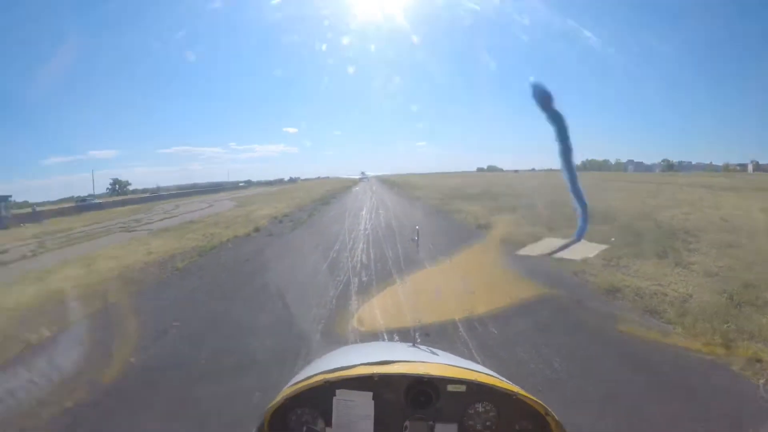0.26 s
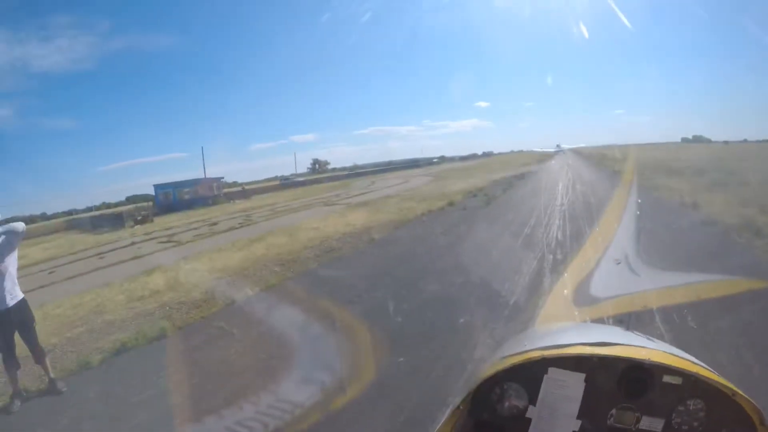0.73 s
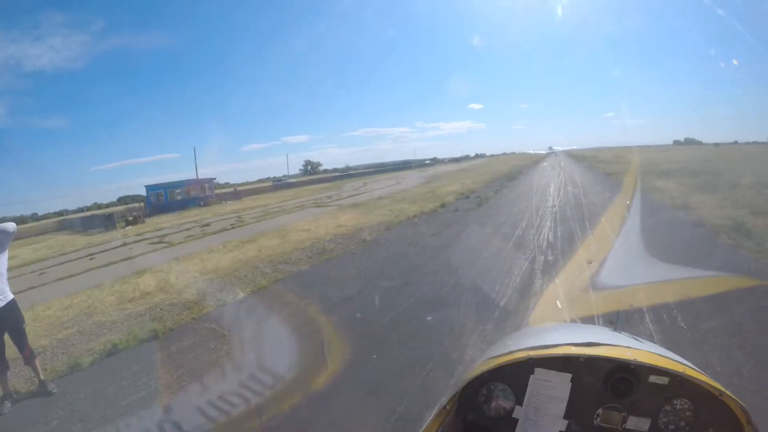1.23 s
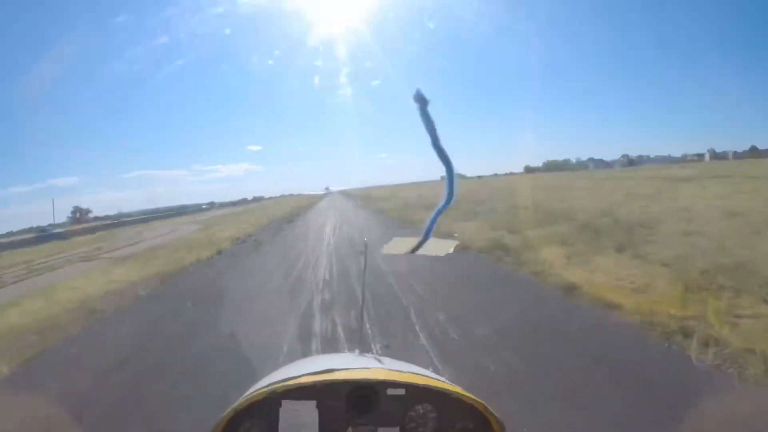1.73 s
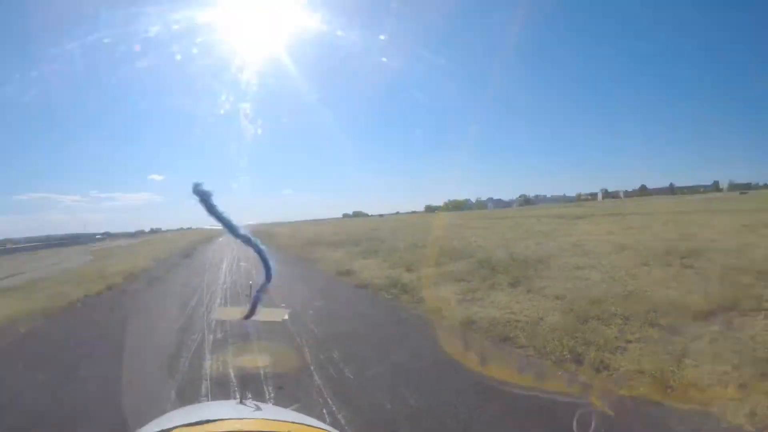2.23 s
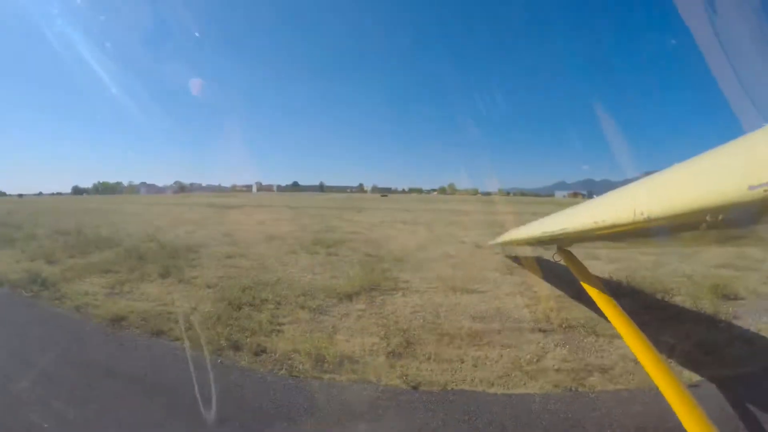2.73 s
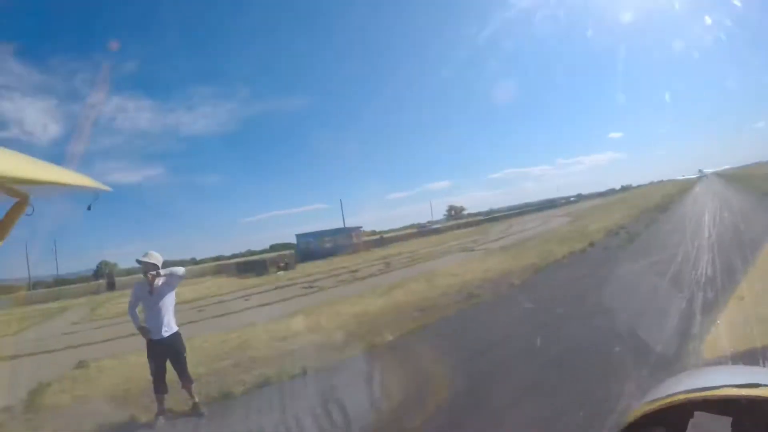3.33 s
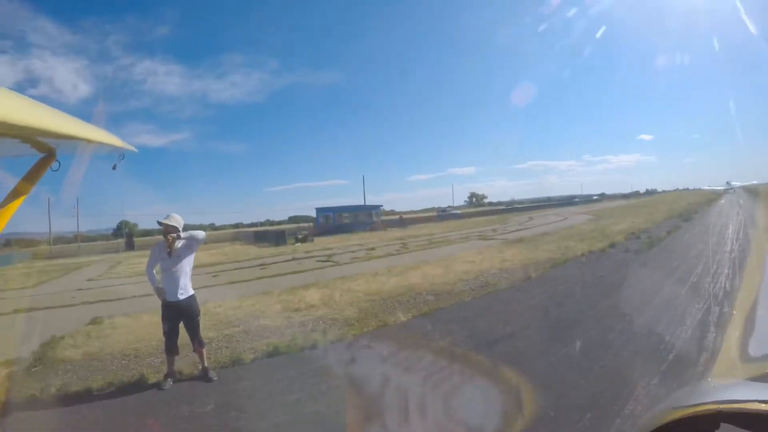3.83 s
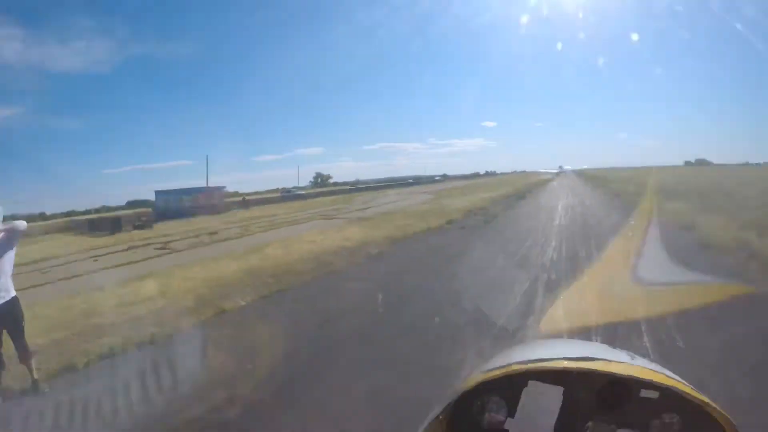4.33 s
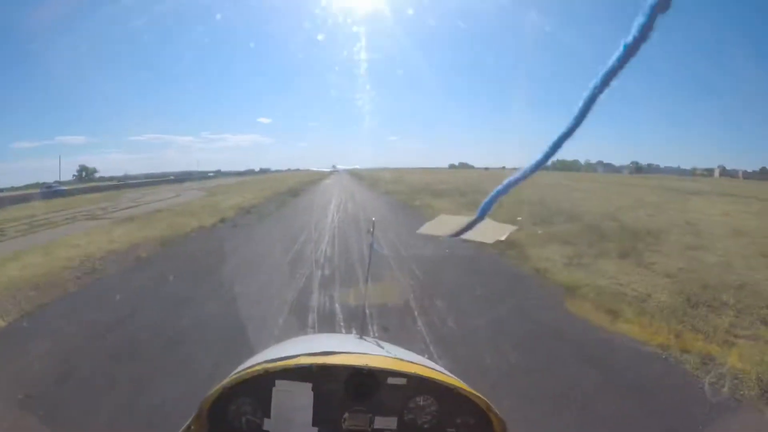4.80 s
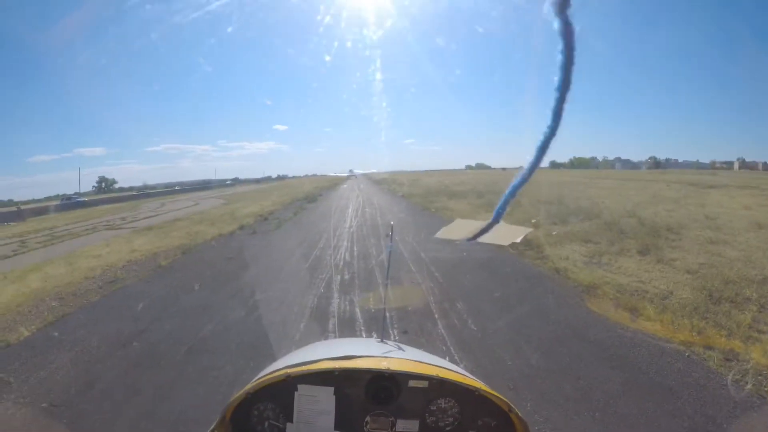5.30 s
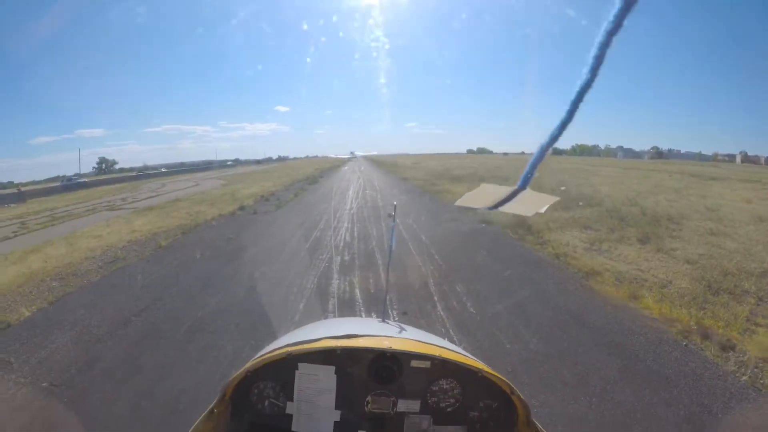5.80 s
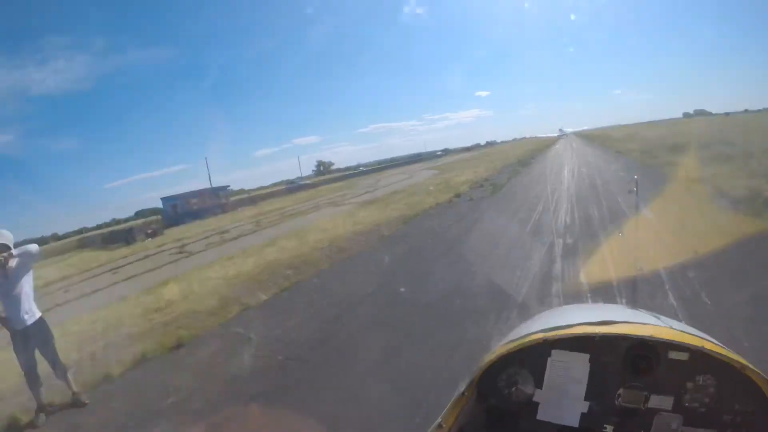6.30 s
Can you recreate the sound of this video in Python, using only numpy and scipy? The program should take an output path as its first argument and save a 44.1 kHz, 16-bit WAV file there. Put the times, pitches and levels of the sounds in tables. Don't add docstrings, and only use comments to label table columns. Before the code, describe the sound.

Inside a small, hard-walled glider cockpit, low gusty wind booms steadily over a faint engine drone and soft hiss. Metal linkages knock and loose parts rattle over dull panel thuds. A heavy bump hits the microphone case at 0.6 seconds, a sharp knock follows at 1.4, and a harder bump comes at 3.8, each bump followed by strap rubbing. The small head-worn microphone is very close to the handling noise.

```python
import sys
import numpy as np
from scipy import signal
from scipy.fft import rfft, irfft
from scipy.io import wavfile
from scipy.ndimage import uniform_filter1d

SR = 44100
rng = np.random.default_rng(int(sys.argv[2]) if len(sys.argv) > 2 else 0)


def put_to_file(sound):
    columns = np.atleast_2d(sound).T
    safe = np.clip(columns, -1, 1)
    whole_steps = np.round(safe * 32767)
    wavfile.write(sys.argv[1], SR, whole_steps.astype(np.int16))


def volts(x):
    e = np.asarray(x, float) / 20
    return 10 ** e


N = 288855


def evened(x):
    return x / np.sqrt(np.mean(x ** 2) + 1e-20)


def peak(x):
    return x / np.sqrt(uniform_filter1d(x ** 2, size=180).max())


def add(mix, start_s, sound):
    part = mix[round(start_s * SR):][:len(sound)]
    part += sound[:len(part)]


def play(source, rows):
    mix = np.zeros(N)
    for row in rows:
        add(mix, *source(*row))
    return mix


def resonate(x, hz, width_hz):
    turn = np.exp(2j * np.pi * np.cumsum(hz * np.ones(len(x))) / SR)
    decay = np.exp(-np.pi * width_hz / SR)
    smooth = signal.lfilter([1 - decay], [1, -decay], x / turn + 1e-18)
    return 2 * (turn * smooth).real


def body(x, modes):
    out = np.zeros(len(x))
    for k, (hz, width_hz, db) in enumerate(modes):
        out += (-1) ** k * volts(db) * resonate(x, hz, width_hz) / np.sqrt(width_hz)
    return out


def filtered(x, spectrum):
    f, db = np.transpose(spectrum)
    hz = np.fft.rfftfreq(len(x), 1 / SR)
    gain = volts(np.interp(np.log(hz + 1), np.log(f), db))
    return irfft(rfft(x) * gain, len(x))


def coloured(spectrum, count, patchy_db, flicker_db):
    frames, hz = count // 128 + 6, np.fft.rfftfreq(512, 1 / SR)
    a, b, patches = rng.standard_normal((frames, 257, 3)).T
    patches = uniform_filter1d(patches, size=6, axis=0)
    patches = evened(uniform_filter1d(patches, size=16, axis=1))
    flicker = evened(uniform_filter1d(rng.standard_normal(frames), size=5))
    f, db = np.transpose(spectrum)
    level_db = np.interp(np.log(hz + 1), np.log(f), db)[:, None]
    level_db = level_db + patchy_db * patches + flicker_db * flicker
    noise = signal.istft((a + 1j * b) * volts(level_db), nperseg=512, noverlap=384)[1]
    return evened(noise[:count])


def fibres(count):
    a, b = rng.standard_normal((count, 2)).T
    return a * volts(0.3 * b)


def rebounds(count):
    return volts(3.65 * evened(uniform_filter1d(rng.standard_normal(count), size=130)))


# start in seconds, blow in dB,
# place from long tube [-1] to short tube [1], ring T60 in seconds.
KNOCKS = [(0.438, -60, 0.45, 0.14), (0.465, -50, -1.1, .07), (0.538, -36, -0.62, .14),
          (1.130, -42.5, 0.36, 0.091), (1.172, -45, -0.39, 0.19), (1.192, -45, 0.032, 0.097),
          (1.263, -45.5, 0.19, .07), (1.319, -55, -0.38, 0.077), (1.399, -21, 0.3, .09),
          (1.509, -58, -.9, .1), (1.564, -55, -0.51, .09), (1.826, -43.5, -0.035, 0.16),
          (1.932, -52, -0.31, .09), (2.038, -52, -0.021, 0.055), (2.26, -41, -0.18, 0.15),
          (2.722, -52, -0.72, 0.1), (3.107, -55, -0.21, 0.065), (3.211, -47, -0.58, 0.05),
          (3.575, -63, .01, .07), (4.643, -39.5, -0.89, 0.13), (4.708, -38.5, 0.083, .11),
          (4.911, -57, .2, .07), (5.251, -62, 0.23, .15), (5.320, -51.5, .01, 0.23),
          (5.598, -56, 0.78, 0.15), (5.722, -45.5, -0.39, 0.12), (5.808, -47, -0.22, 0.086),
          (5.933, -45, 0.24, 0.11), (6.201, -43.5, -0.094, 0.21), (6.358, -44, -0.31, 0.21)]
# centre in Hz, width in Hz, level in dB.
STRUTS = [(774, 210, 13), (1390, 120, 7.5), (1520, 200, 7), (2280, 780, 1), (2410, 860, -17)]
LONG_TUBE = [(304, 57, -2), (396.3, 5.7, -3), (530, 41, 4.5)]
# centre in Hz, width in Hz.
SHORT_TUBE = (600, 160)


def knock(start_s, blow_db, place, t60_s):
    tubes_db = 6 - 0.39 * (blow_db + 43)
    long_db, short_db = tubes_db - 4.5 * place, tubes_db + 4.5 * place
    t = np.arange(9000) / SR
    fade = volts(-60 * t / np.clip(t60_s, .02, .4)) * (1 - np.exp(-t / 0.00025))
    first_contact = volts(2 * np.exp(-t / 0.0037))
    chatter = fibres(len(t)) * fade * rebounds(len(t)) * first_contact
    long = resonate(body(chatter, LONG_TUBE), 251, 166)
    short = resonate(resonate(chatter, *SHORT_TUBE), SHORT_TUBE[0], 170)
    struts = resonate(body(chatter, STRUTS), 1200, 3800)
    tubes = volts(long_db) * peak(long) + volts(short_db) * peak(short)
    return start_s, volts(blow_db) * (peak(struts) + tubes)


# start in seconds, level in dB, tilt in dB per octave.
RATTLES = [(0.465, -50.5, 0), (0.537, -44, 7), (0.554, -52, 4), (1.093, -51.5, -9), (1.1296, -53, 2),
           (1.1702, -45, 4.5), (1.19, -53, -11), (1.262, -41.5, 8.5), (1.397, -31, 7), (1.417, -30.5, -4),
           (1.56, -50, -2), (1.806, -45.5, 1), (1.826, -47.5, 7), (1.925, -56, -3), (2.035, -49.5, 1.5),
           (2.261, -51, 6.5), (2.7224, -51, 9.5), (3.123, -55, 0), (3.21, -56, 3), (3.57, -48, 2),
           (4.641, -39.5, 1.5), (4.7078, -44, 4), (4.9095, -55.5, 7), (5.25, -52.5, 3.5), (5.33, -55.5, 8),
           (5.72, -53, 7), (5.807, -54, 7), (5.93, -51, 10.5), (6.2, -47, 9), (6.357, -50, 7.5)]
# frequency in Hz, density in dB per Hz.
CLATTER = [(1530, 10), (2600, 6.5), (3060, 3), (3320, 3), (4370, -1.5), (5880, -3), (7130, -10.5),
           (9450, -12.5), (10600, -21), (12200, -27), (15300, -33)]


def rattle(start_s, db, tilt_db):
    hold_s = 0.071
    t = np.arange(7000) / SR
    colour = [(hz, level_db + tilt_db * np.log2(hz / 5500)) for hz, level_db in CLATTER]
    linger = (1 - np.exp(-t / 0.0022)) * volts(-60 * (t / hold_s) ** 1.64)
    return start_s, volts(db) * peak(filtered(fibres(len(t)), colour) * linger * rebounds(len(t)))


# start in seconds, peak in dB, panel note in Hz.
THUDS = [(0.473, -32, 172), (0.532, -29, 170), (0.558, -26, 221), (1.132, -19.5, 174), (1.192, -32.5, 247),
         (1.248, -26, 212), (1.396, -23, 183), (1.511, -23.5, 171), (1.565, -23.5, 180), (1.825, -20, 194),
         (2.126, -39, 180), (2.263, -28.5, 204), (3.22, -26, 181), (3.923, -23.5, 199), (4.317, -34, 268),
         (4.433, -26.5, 183), (4.649, -23.5, 176), (4.709, -27.5, 199), (5.325, -27, 160),
         (5.358, -28, 217), (5.602, -27.5, 201), (5.727, -22, 188), (5.931, -23.5, 185), (6.203, -24, 195),
         (6.368, -19.5, 187)]


def thud(start_s, db, hz):
    t60_s = 0.082
    t = np.arange(9000) / SR
    neighbour = np.sin(2 * np.pi * 1.375 * hz * t + 2 * np.pi * rng.random())
    ring = np.sin(2 * np.pi * hz * t) + 0.16 * neighbour
    return start_s, volts(db) * peak(ring * (1 - np.exp(-t / 0.0017)) * volts(-60 * t / t60_s))


# time in seconds, tick in dB,
# bright part in dB re tick, scrape length in seconds.
BUMPS = [
    (0.602, -41, -20, 0.0022),
    (0.612, -30.5, -29, 0.0028),
    (0.6228, -24.5, -27, 0.003),
    (3.772, -43, -17, 0.0022),
    (3.7844, -38, -12, 0.0032),
    (3.794, -23.5, -20, 0.0081),
    (3.8065, -14.5, -10.5, 0.0024),
    (3.837, -47, -26, 0.0017),
]
# centre in Hz, width in Hz, level in dB.
CASE = [(550, 100, -3), (930, 116, -3.5), (1506, 280, -1), (1950, 650, -5), (2510, 390, -7.5)]
CASE_TOP = [(2960, 540, 14), (4050, 1100, 20), (4900, 1500, 20), (5670, 260, 14.5), (8700, 260, 4),
            (11400, 2900, -18)]


def bump(time_s, tick_db, bright_db, scrape_s):
    t = np.arange(4000) / SR - .004
    slope_s = np.where(t < .0008, .0011, max(scrape_s, .0005))
    crack = rng.standard_normal(len(t)) * np.exp(-abs(t - .0008) / slope_s)
    ring = peak(resonate(body(crack, CASE), 730, 1500))
    bright = peak(resonate(body(crack, CASE_TOP), 6300, 6700))
    return time_s - .004, volts(tick_db) * (ring + volts(bright_db) * bright)


# time in seconds, mount shake in dB, head sway in dB, direction sign.
JOLTS = [
    (0.614, -10, -30, -1),
    (0.6221, -11, -35, -1),
    (0.6269, -3, -26, 1),
    (0.629, -19, -8, -1),
    (0.638, -9.5, -36, -1),
    (3.789, -13, -28, -1),
    (3.8, -1.5, -34, 1),
    (3.8099, -0.5, -32, -1),
    (3.813, -1.5, -21, 1),
]
# frequency in Hz, level in dB, T60 in seconds.
MOUNT = [(125.5, 2, 0.054), (225, -5.5, 0.038), (342, 13.5, 0.01), (70, -37, 0.15)]
# frequency in Hz, T60 in seconds.
SWAY = (31, 0.3)


def jolt(time_s, shake_db, sway_db, way):
    t = np.arange(16000) / SR
    shake = sum(volts(db - 60 * t / t60_s) * np.sin(2 * np.pi * hz * t) for hz, db, t60_s in MOUNT)
    sway = volts(-60 * t / SWAY[1]) * np.sin(2 * np.pi * SWAY[0] * t)
    motion = volts(shake_db) * peak(shake) + volts(sway_db) * sway
    soft = uniform_filter1d(np.pad(motion, (80, 0)), size=50)
    return time_s - .001, np.sign(way) * uniform_filter1d(soft, size=36)


# start in seconds, length in seconds, rush in dB, fizz in dB.
SLIDES = [(0.616, 0.2, -40.5, -63.5), (1.101, 0.43, -42, -57), (1.398, 0.042, -37.5, -58),
          (1.453, 0.089, -43.5, -58), (1.603, 0.27, -54, -67), (2.116, .13, -49, -68),
          (2.999, 0.17, -55, -65), (3.785, 0.064, -28.5, -74), (3.849, 0.18, -41, -61),
          (4.042, 0.24, -40.5, -65.5), (4.318, 0.22, -54, -80), (5.233, 0.14, -50, -62),
          (5.493, 0.098, -48.5, -64)]
# frequency in Hz, density in dB per Hz.
STRAP = [(120, -53), (220, 3.5), (450, -8.5), (800, -15.5), (1500, -21), (2000, -30), (3200, -50),
         (10000, -72)]


def slide(start_s, length_s, rush_db, fizz_db):
    grip_s, let_go_s, rest_db = 0.018, 0.064, -15.5
    t = np.arange(0, length_s + let_go_s, 1 / SR)
    at_rest = np.clip(np.maximum(1 - t / grip_s, (t - length_s) / let_go_s), 0, 1)
    rush = coloured(STRAP, len(t), patchy_db=1.2, flicker_db=1.0)
    fizz = resonate(resonate(fibres(len(t)), 2600, 7300), 3700, 11000)
    fizz = evened(signal.lfilter(*signal.butter(2, 8200 / (SR / 2)), fizz))
    rub = volts(rush_db) * rush + volts(fizz_db + 2 * t) * fizz
    return start_s, volts(rest_db * at_rest) * rub * signal.windows.tukey(len(t), .06)


def glide(length_s, from_hz, to_hz, width_hz, db):
    way = np.linspace(0, 1, round(length_s * SR))
    hz = from_hz + (to_hz - from_hz) * way
    band = fibres(len(way))
    for widen in (1, 1.6, 2.5):
        band = resonate(band, hz, widen * width_hz)
    return volts(db - 6 * way) * evened(band) * signal.windows.tukey(len(way), .3)


# start in seconds, length in seconds,
# closing gap in dB, opening gap in dB.
DRIFTS = [
    (0.638, 0.45, -64.5, -88),
    (1.428, .62, -74, -67.5),
    (3.835, 0.51, -78, -66),
    (3.922, 0.68, -63, -84),
]
# from in Hz, to in Hz, width in Hz, level in dB.
CLOSING = [(1030, 1380, 880, 5), (1730, 2660, 650, 4.5), (4400, 5100, 650, -5.5)]
OPENING = [(6300, 6800, 650, -3), (8900, 6700, 900, 1.7), (10300, 9100, 1200, -4)]


def gap_hiss(start_s, length_s, closing_db, opening_db):
    hiss = 0
    for level_db, bands in ((closing_db, CLOSING), (opening_db, OPENING)):
        for from_hz, to_hz, width_hz, db in bands:
            hiss = hiss + glide(length_s, from_hz, to_hz, width_hz, level_db + db)
    return start_s, hiss


# start in seconds, length in seconds, level in dB, tilt in dB per octave.
BUZZES = [
    (.612, 0.028, -53, 5),
    (0.644, 0.106, -67, -2),
    (1.263, 0.036, -51, 7),
    (1.385, 0.053, -43.5, 6),
    (3.794, 0.021, -47, -2.5),
    (3.826, 0.068, -51, 4),
    (3.901, 0.1, -66, -1),
]
# centre in Hz, width in Hz, level in dB.
BUZZ = [(1610, 480, 10), (4180, 500, -1), (5460, 1400, 2.5)]


def case_buzz(start_s, length_s, level_db, tilt_db):
    buzz = 0
    for hz, width_hz, db in BUZZ:
        band_db = level_db + db + tilt_db * np.log2(hz / 5750)
        buzz = buzz + glide(length_s, hz, hz, width_hz, band_db)
    return start_s, buzz


# start in seconds, length in seconds, centre in Hz, width in Hz, level in dB.
TUBE_HUM = (6, 1, 633, 64, -51)


def tube_hum(start_s, length_s, hz, width_hz, db):
    return start_s, glide(length_s, hz, hz, width_hz, db)


# time in seconds, gust in dB, side-on share from -1 to 1.
GUSTS = [(0.0, -21.5, 0.01), (0.44, -29, 0.011), (0.69, -22.5, 0.01), (1.0, -35.5, 0.01),
         (1.26, -18.5, 0.01), (1.5, -26.5, 0.01), (2.21, -24, 0.01), (2.74, -26, 0.01), (3.14, -24, 0.01),
         (3.34, -28, 0.01), (3.76, -28, 0.01), (4.34, -33, 0.01), (4.71, -27, 0.01), (4.98, -28.5, 0.01),
         (5.34, -27.5, 0.01), (5.87, -26, 0.01), (6.24, -27.5, 0.01), (6.55, -23, 0.01)]
# centre in Hz, width in Hz, level in dB.
BOOMS = [(90.7, 26, 0.5), (118, 26, 1.5), (157, 13.5, -4), (161.6, 5.25, -6.5)]
# centre in Hz, width in Hz.
LOW_BOOM = (50.6, 18.7)
# frequency in Hz, density in dB per Hz.
HUSH = [(100, -42), (170, -4), (210, -11), (300, -15.5), (500, -23), (650, -25), (1000, -31.5), (2000, -39),
        (4500, -45), (6500, -46.5), (10000, -46), (11500, -51.5), (13500, -55), (15300, -69)]
# frequency in Hz, level in dB.
DRONE = (53.2, -29.5)


def wind():
    t = np.arange(N) / SR
    time_s, gust_db, side = np.transpose(GUSTS)
    gust_db = np.interp(t, time_s, gust_db) + 24
    side_db = 2 * np.interp(t, time_s, side)
    a, b, c = rng.standard_normal((N, 3)).T
    buffet = resonate(resonate(a, 22.5, 18), 22.5, 18)
    low = resonate(resonate(b, *LOW_BOOM), LOW_BOOM[0], 46)
    upper = resonate(body(c, BOOMS), 134.3, 76)
    booms = volts(-26.5 + 0.99 * gust_db + side_db) * evened(buffet)
    booms += volts(-29 + 0.43 * gust_db - side_db) * evened(low)
    booms += volts(-29 + 0.49 * gust_db) * evened(upper)
    drone = volts(DRONE[1]) * np.sqrt(2) * np.sin(2 * np.pi * DRONE[0] * t + 0.9)
    hush = volts(-41.5) * coloured(HUSH, N, patchy_db=0.52, flicker_db=-0.23)
    return booms + drone + hush


def cabin(x):
    t = np.arange(8000) / SR
    hits = rng.random(len(t)) < 2500 / SR
    taps = rng.choice([-1., 1.], len(t)) * hits * volts(-60 * t / 0.19)
    return signal.oaconvolve(x, taps / np.linalg.norm(taps))[:N]


def scene():
    frame = play(knock, KNOCKS) + play(rattle, RATTLES)
    hull = play(thud, THUDS) + play(jolt, JOLTS)
    case = play(bump, BUMPS)
    cloth = play(slide, SLIDES)
    whistles = play(gap_hiss, DRIFTS) + play(case_buzz, BUZZES) + play(tube_hum, [TUBE_HUM])
    rooms = volts(-8.0) * cabin(frame) + volts(-12.0) * cabin(case)
    return (frame + hull + case + cloth + whistles + wind() + rooms)[None]


def top_cut(x):
    return signal.sosfilt(signal.butter(12, 15470, fs=SR, output="sos"), x)


def record(dry):
    cut = signal.lfilter(*signal.butter(1, 12 / (SR / 2), "high"), dry)
    rounded = cut / (1 + abs(cut / .95) ** 4) ** .25
    close = np.clip((N - np.arange(N)) / 250, 0, 1)
    edge = signal.firwin(401, 15000, window=("kaiser", 9), fs=SR)
    mix = signal.oaconvolve(rounded * close, edge[None], "same")
    return top_cut(mix)


dry = scene()
out = record(dry)
put_to_file(out)
```